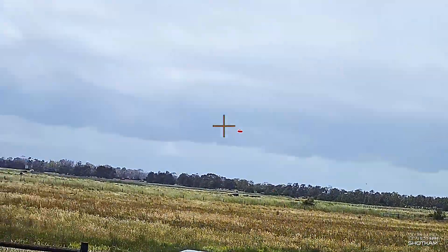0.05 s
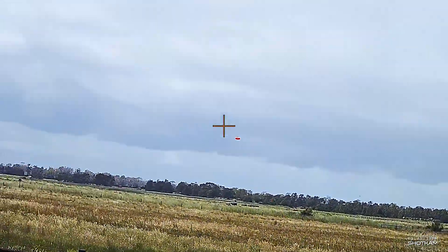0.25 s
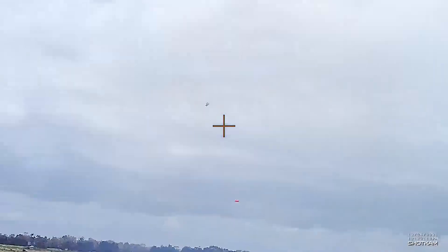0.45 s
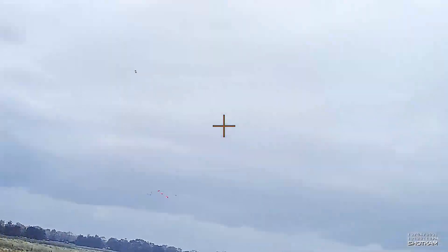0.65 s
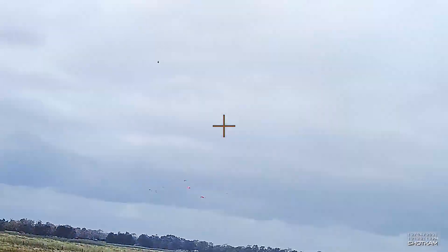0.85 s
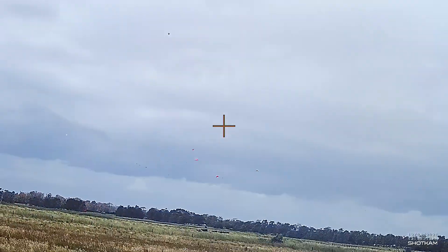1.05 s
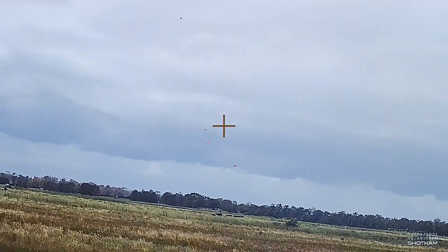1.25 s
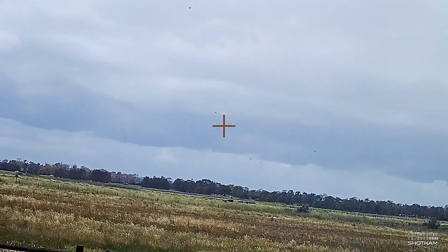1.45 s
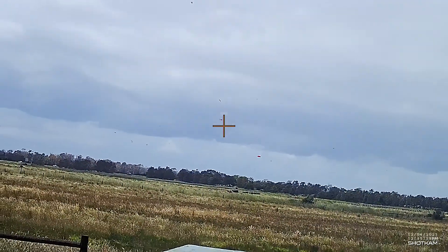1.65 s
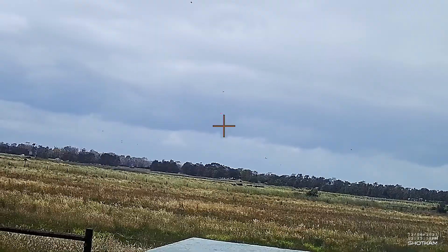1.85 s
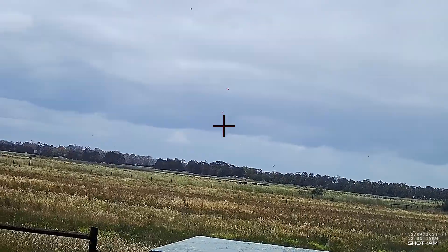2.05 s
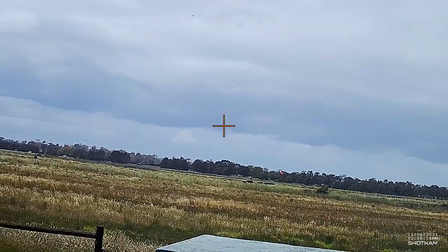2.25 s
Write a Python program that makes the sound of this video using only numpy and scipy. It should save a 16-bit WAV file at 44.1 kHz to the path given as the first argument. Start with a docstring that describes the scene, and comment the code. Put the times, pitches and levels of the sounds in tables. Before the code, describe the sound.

A shotgun fires once over an open field, overloading a microphone on the barrel with a crack and deep thump. Steel parts jangle briefly, the report rolls away, and faint handling knocks follow over a low rumble of air.

```python
"""A lock snaps and at once a shotgun fires over an open field, heard by a microphone on the barrel.
The blast overloads the microphone, and the recoil shakes its mount in a deep, dying swing.
Loose steel parts jangle briefly and the barrel rings on; the report rolls away and the trees answer.
Small impacts in the handled gun ring its stock and action, over a low rumble and hiss of air."""
import sys
import numpy as np
from scipy import signal
from scipy.io import wavfile

SR = 44100
rng = np.random.default_rng(int(sys.argv[2]) if len(sys.argv) > 2 else 0)


def log_audio(samples):
    """Write samples as a 16-bit WAV file to the path given in sys.argv[1]."""
    # one column per channel
    frames = np.atleast_2d(samples).T
    # limit to full scale, then quantise
    limited = np.clip(frames, -1, 1)
    pcm = np.round(limited * 32767).astype(np.int16)
    wavfile.write(sys.argv[1], SR, pcm)


N = 101429
T = np.arange(N) / SR

LOCK_S, SHOT_S = .2058, .2128   # the hammer falls, then the gun fires
CRACK_DB, CRACK_RISE_S, CRACK_T60_S = 6, .00069, .035
BOOM_DB, BOOM_RISE_S, BOOM_HOLD_S, BOOM_T60_S = 15, .007, .012, .045
SWING_S, SWING_HZ, SWING_DB, SWING_T60_S = .2112, 31.5, 15, .37   # main swing of the mount
RECOIL_BUILD_S = .018
THUD_T60_S, BRIGHT_HZ = .075, 1800
CHATTER_DB, CHATTER_DECAY_S, RATTLE_DB, RATTLE_DECAY_S = -22.5, .007, -39, .024
REPORT_DB, ROLL_DB, ECHO_DB = -12, -47, -62
AIR_DB, RUSH_ABOVE_AIR_DB = -42, 6
CLIP_LEVEL, CUTOFF_HZ = .72, 8050

# Sharp front of the blast: (frequency [Hz], relative density [dB])
CRACK_SPECTRUM = [(100, -14.5), (350, -7.5), (600, 1), (1200, -7), (2500, -11), (5000, -27.5),
                  (8000, -33.5)]
# Body of the muzzle blast: (frequency [Hz], relative density [dB])
BOOM_SPECTRUM = [(40, -7), (170, 2), (300, -6.5), (600, -9.5), (1200, -20), (2500, -29.5), (5000, -37),
                 (8000, -42.5)]
# A fast shudder and a slow heave of pressure: (start [s], frequency [Hz], relative level [dB], T60 [s])
RECOIL_SWINGS = [(.226, 56, 2, 0.32), (.47, 2.341, -15, 1.55)]
# Ringing of the barrel, with a brief jangle of the action's loose steel parts near 1.9 kHz:
# (frequency [Hz], level [dB], T60 [s])
RING_AND_JANGLE = [(392, -61, 7), (458, -55, 4.6), (587, -54, 2.0), (694.5, -33.5, 2.2), (1373, -59, 2.2),
                   (1766, -28, .58), (1890, -13, .27), (2223, -40, .78), (2982, -42, .42)]
# Impacts in the handled gun; the last three levels are relative to the first:
# (time [s], level [dB], brightness [dB], steel ring [dB], thud frequency [Hz], thud [dB])
HANDLING_KNOCKS = [(0.367, -20.5, 3, -8.5, 189.7, 4), (.371, -27, 4.5, -16, 620, 4),
                   (.381, -27, -13.5, -20.5, 194, 13), (0.406, -37.5, -4, -12, 200, 12.5),
                   (0.43, -25, 0, -27, 201, 6), (.433, -24.5, -6, -26, 579, 1.5),
                   (.455, -45.5, -6, -21, 198, 18), (.519, -56.5, 10, -38, 205, -13.5),
                   (0.6529, -28, -2, -22, 224, -3.5), (0.6582, -25.5, -5.5, -16, 639, -4),
                   (0.711, -26.5, -1, -4.5, 394, 0), (0.7135, -32, -5.5, 2.5, 150, -1),
                   (.739, -38.5, -9, 1.5, 450, 5), (0.802, -31, -2.5, -20, 541, -10),
                   (0.81, -36, -2.5, -37, 233, -4.5), (.85, -49.5, -2, -17, 210, 5.5),
                   (.961, -39.5, -2, -21, 320, -11.5), (1.205, -57, -22, -30, 201, 3),
                   (1.241, -41, -11.5, -40, 210, -4.5), (1.284, -56, -4, -8, 324, 4.5),
                   (1.391, -43.5, -9, -33, 203, -5), (1.543, -48, -17, -41, 207, -2.5),
                   (1.975, -62, -12, -32, 197.4, -6)]
# Modes of the stock and action: (frequency [Hz], relative level [dB], T60 [s])
STOCK_MODES = [(320, -15, 0.033), (424, -14, 0.023), (550, -8, .04), (660, -9.5, 0.09), (730, -10.5, .04),
               (860, -13, .05), (1074, -13.5, 0.044), (1215, -13, 0.094), (1567, -16.5, .04),
               (2420, -23, .025), (3120, -20.5, 0.028), (3920, -25, 0.015), (5000, -33, .02)]
# Modes of the action's steel parts: (frequency [Hz], relative level [dB], T60 [s])
STEEL_MODES = [(1850, -7, .06), (1925, -10, .045), (2000, -8, .055)]
# Report dying away nearby: (frequency [Hz], relative density [dB], T60 [s])
REPORT_SPECTRUM = [(60, -1.5, .35), (150, 3, .33), (260, -2.5, 0.69), (500, -5.5, .47), (850, -14.5, .47),
                   (1200, -14.5, 0.54), (2000, -17.5, 0.33), (4040, -25, .43), (6000, -25.5, 0.26),
                   (8000, -35, 0.15)]
# Long roll over the field: (frequency [Hz], relative density [dB], T60 [s])
ROLL_SPECTRUM = [(60, -11, 1.7), (150, -13, 2.5), (210, -3, 2.0), (290, -6.5, 3.5), (450, -7.5, 2.2),
                 (620, -1, 3.8), (900, -9, 2.1), (2000, -17.5, 1.3), (4000, -27, 1.2), (8000, -44, 1.0)]
# Echo from the tree line: (frequency [Hz], relative density [dB])
ECHO_SPECTRUM = [(100, -15), (150, -17), (205, 0), (295, -18), (600, -17), (1000, -27), (2000, -40)]
# Air on the microphone, and its hiss: (frequency [Hz], relative density [dB])
AIR_SPECTRUM = [(12, 3.5), (25, -9), (50, -33.5), (100, -46), (200, -47.5), (500, -53.5), (1500, -58.5),
                (4000, -61), (7000, -63), (9000, -69.5)]
# Air driven across the microphone by the moving gun: (frequency [Hz], relative density [dB])
RUSH_SPECTRUM = [(12, 3.5), (30, -5), (60, -19), (120, -42), (400, -71)]


def muzzle_blast():
    """Sudden expansion of gas radiates a shock: a sharp crack, then a short boom."""
    age, release = T - SHOT_S, SHOT_S + BOOM_HOLD_S
    crack_envelope = np.clip(age / CRACK_RISE_S, 0, 1) * dying(SHOT_S, CRACK_T60_S)
    boom_envelope = np.clip(age / BOOM_RISE_S, 0, 1) * ((T < release) + dying(release, BOOM_T60_S))
    crack = from_db(CRACK_DB) * crack_envelope * noise(CRACK_SPECTRUM)
    boom = from_db(BOOM_DB) * boom_envelope * noise(BOOM_SPECTRUM)
    return crack + boom


def recoil():
    """Conservation of momentum drives the gun back in one push, and the mount oscillates freely."""
    build = np.clip((T - SHOT_S) / RECOIL_BUILD_S, 0, 1) ** 2
    shake = damped_sine(SWING_S, SWING_HZ, SWING_DB, SWING_T60_S)
    shake += sum(damped_sine(*swing) for swing in RECOIL_SWINGS)
    kick = from_db(12 * swell(.26, width_s=.009))   # hardest as the stock meets the shoulder
    push = from_db(26) * swell(.2485, width_s=.008)
    suction = from_db(-12) * swell(.335, width_s=.043)   # the pressure sags after the blast
    return build * (kick * shake + push - suction)


def barrel_and_loose_parts():
    """Free vibration: after the shot the barrel rings and the action's loose steel jangles briefly."""
    return sum(damped_sine(SHOT_S, *partial) for partial in RING_AND_JANGLE)


def lock_and_action():
    """Impact excitation: the hammer strikes just before the shot, and the action knocks afterwards."""
    lock = knock(LOCK_S, db=-15, bright_db=-6.5, steel_db=-15, thud_hz=104, thud_db=-2.5)
    return lock + sum(knock(*row) for row in HANDLING_KNOCKS)


def knock(start, db, bright_db, steel_db, thud_hz, thud_db):
    """Modal response: one contact thuds, and its brief chatter rings the stock and the steel parts."""
    t = np.arange(SR // 4) / SR
    impulse = t == 0
    sound = from_db(thud_db) * resonator(impulse, thud_hz, THUD_T60_S)
    modes = [(hz, level + bright_db * min((hz / BRIGHT_HZ) ** 2, 2), t60)
             for hz, level, t60 in STOCK_MODES]
    modes += [(hz, level + steel_db, t60) for hz, level, t60 in STEEL_MODES]
    chatter = from_db(CHATTER_DB) * np.exp(-t / CHATTER_DECAY_S)
    rattle = from_db(RATTLE_DB) * np.exp(-t / RATTLE_DECAY_S)
    for k, (hz, level, t60) in enumerate(modes):
        force = impulse + (chatter + rattle) * rng.standard_normal(len(t))
        force /= np.linalg.norm(force)   # unit energy
        sound += (-1) ** k * from_db(level) * resonator(force, hz, t60)   # modes alternate in sign
    return from_db(db) * np.pad(sound, (int(start * SR), N))[:N]


def field():
    """Reverberation: the near report dies fast, a dull roll lasts, and the trees reflect a soft swell."""
    echo = from_db(ECHO_DB) * swell(1.258, width_s=.27) * noise(ECHO_SPECTRUM)
    report = from_db(REPORT_DB) * noise(REPORT_SPECTRUM, SHOT_S)
    roll = from_db(ROLL_DB) * noise(ROLL_SPECTRUM, SHOT_S)
    return report + roll + echo


def air():
    """Flow noise: air rumbles on the hissing microphone and swells as the gun moves after the kick."""
    steady = noise(AIR_SPECTRUM)
    rush = from_db(RUSH_ABOVE_AIR_DB) * swell(.68, width_s=.16) * noise(RUSH_SPECTRUM)
    return from_db(AIR_DB) * (steady + rush)


def noise(spectrum, start=None):
    """Spectral shaping: half-octave bands total rms 1; given a start, each decays from it at its T60."""
    hz, db, *t60 = np.transpose(spectrum)
    edges = 11 * 2 ** np.arange(0, 10.1, .5)
    white = rng.standard_normal((2, N + SR))   # neighbouring bands draw on independent noise
    total, power = 0, 0
    for k, (low, high) in enumerate(zip(edges, edges[1:])):
        log_centre = np.log(low * high) / 2
        band_pass = signal.butter(2, [low, high], "band", fs=SR, output="sos")
        band = signal.sosfilt(band_pass, white[k % 2])[SR:]   # the filter settles for a second
        band *= from_db(np.interp(log_centre, np.log(hz), db))
        power += band.var()
        if t60:
            band *= dying(start, np.interp(log_centre, np.log(hz), t60[0]))
        total += band
    return total / np.sqrt(power)


def resonator(force, hz, t60):
    """Two-pole resonance: a unit impulse starts a decaying sine of amplitude 1."""
    radius, angle = from_db(-60 / (t60 * SR)), 2 * np.pi * hz / SR
    return signal.lfilter([0, np.sin(angle)], [1, -2 * radius * np.cos(angle), radius ** 2], force + 1e-18)


def damped_sine(start, hz, db, t60):
    """Damped harmonic motion from the start time on."""
    return from_db(db) * dying(start, t60) * np.sin(2 * np.pi * hz * (T - start))


def dying(start, t60):
    """Exponential decay: silent until the start, then falling from 1 by 60 dB every t60 seconds."""
    return (T >= start) * from_db(-60 * np.maximum(T - start, 0) / t60)


def swell(peak_s, width_s):
    """Gaussian envelope: a smooth rise to 1 and fall."""
    return np.exp(-((T - peak_s) / width_s) ** 2)


def from_db(db):
    """Amplitude ratio of a level in decibels."""
    return 10 ** (np.asarray(db) / 20)


def scene():
    """Superposition: all sources add at the microphone, in one channel."""
    return (muzzle_blast() + recoil() + barrel_and_loose_parts() + field() + lock_and_action() + air())[None]


def record(dry):
    """Saturation squares off the blast and the first swings; a steep low-pass then cuts the treble."""
    clipped = np.clip(dry, -CLIP_LEVEL, CLIP_LEVEL)
    low_pass = signal.firwin(111, CUTOFF_HZ, window=("kaiser", 8), fs=SR)
    return signal.fftconvolve(clipped, low_pass[None], mode="same")


dry = scene()
out = record(dry)
log_audio(out)
```